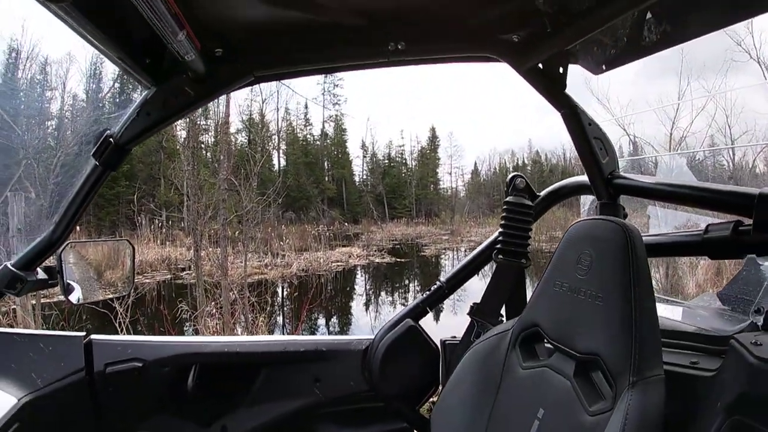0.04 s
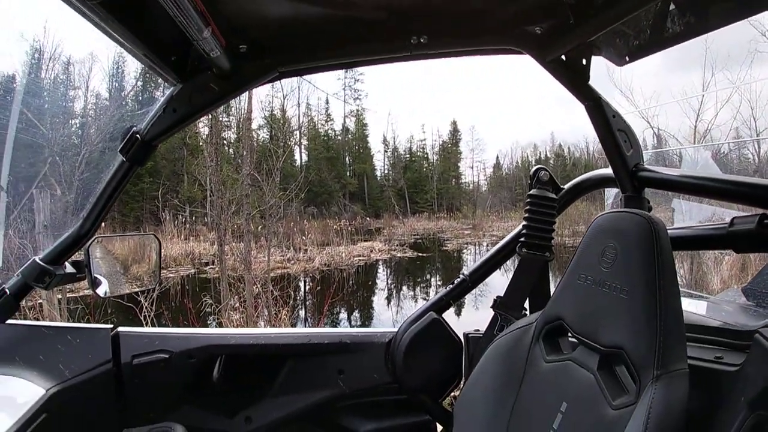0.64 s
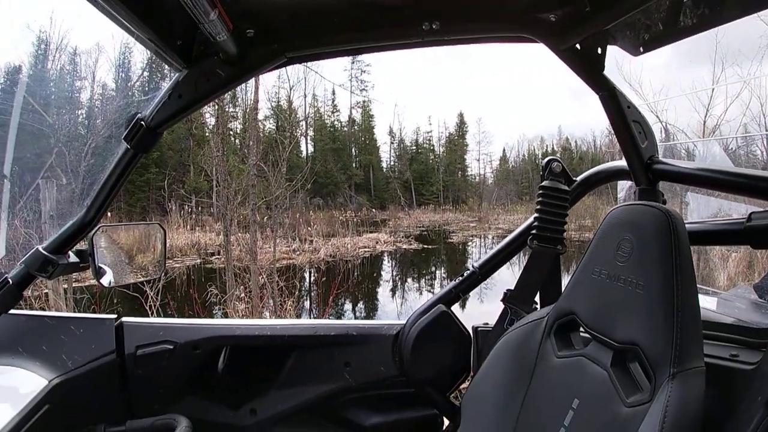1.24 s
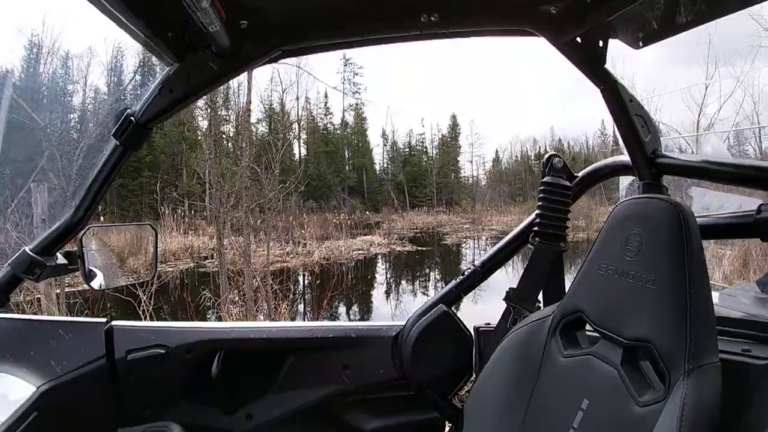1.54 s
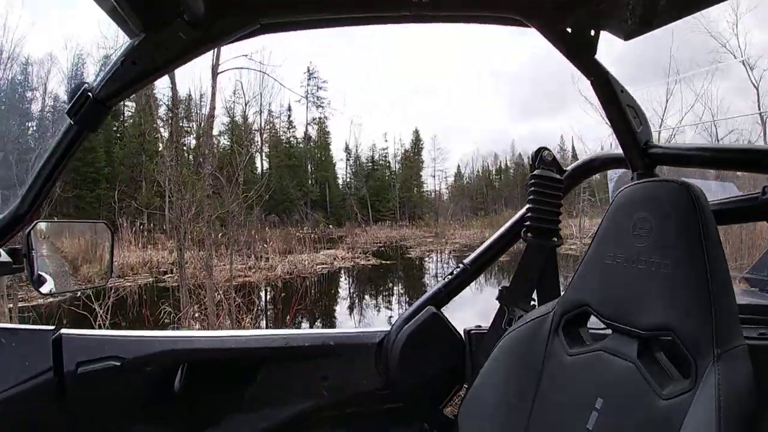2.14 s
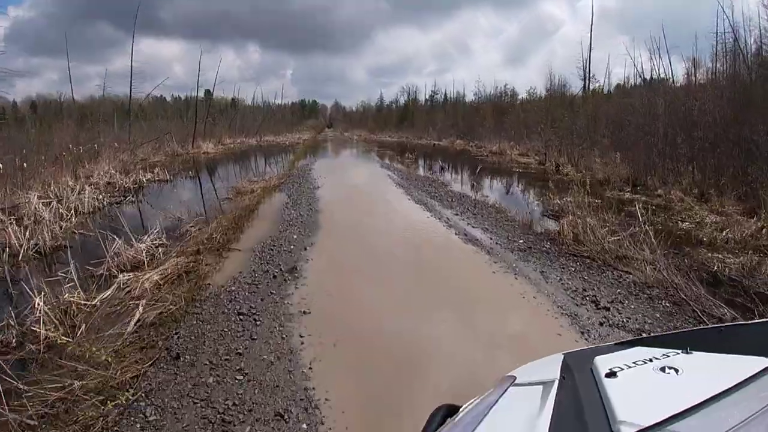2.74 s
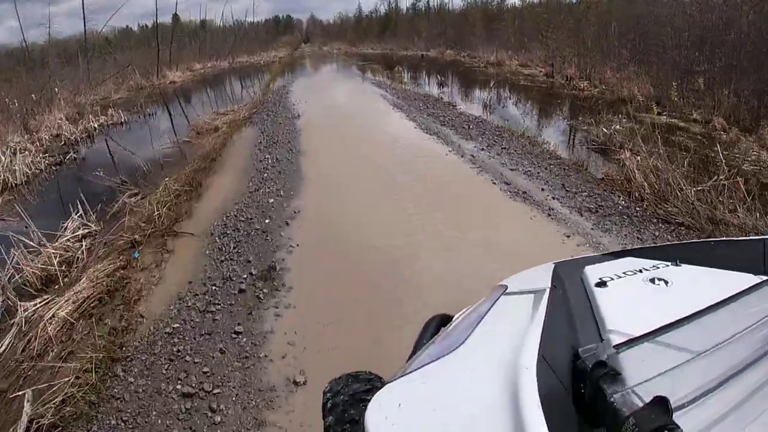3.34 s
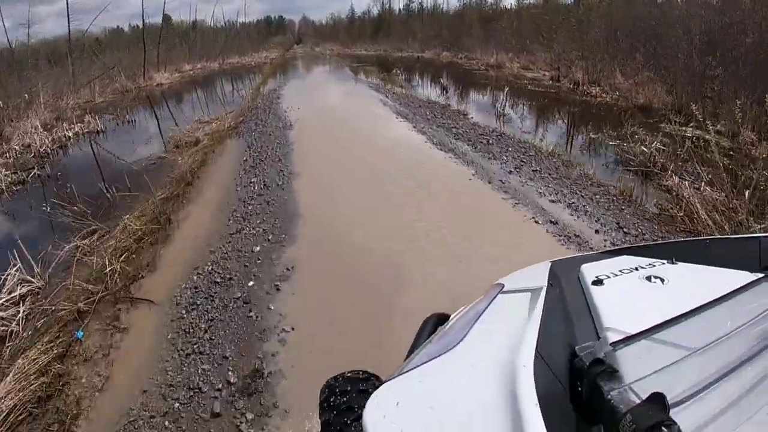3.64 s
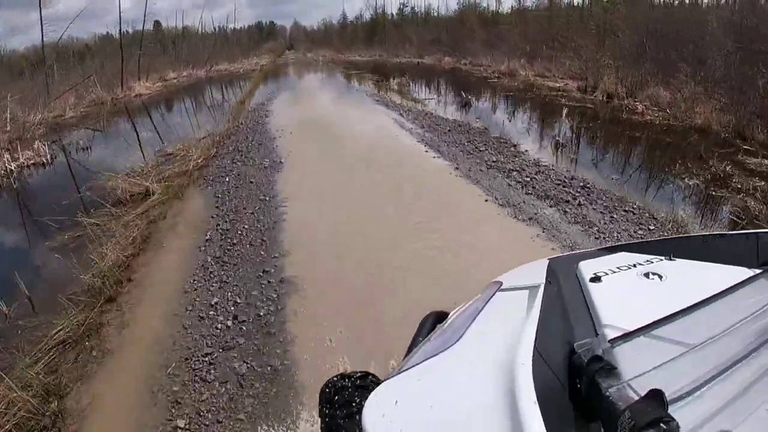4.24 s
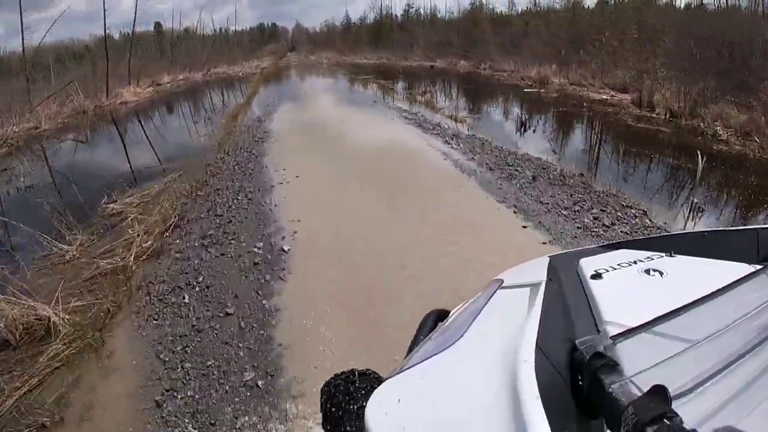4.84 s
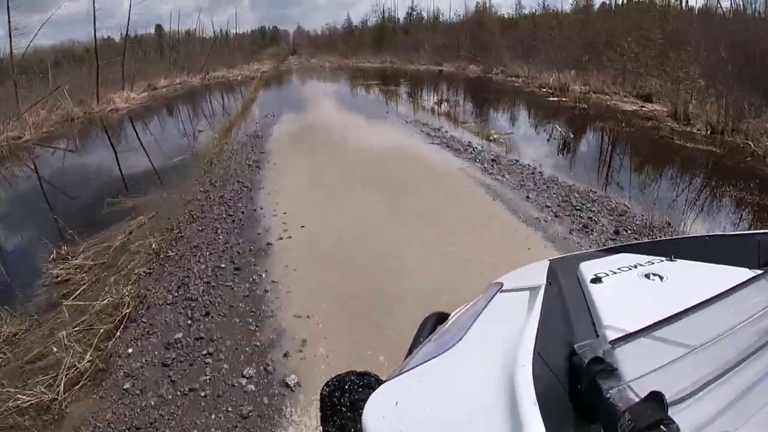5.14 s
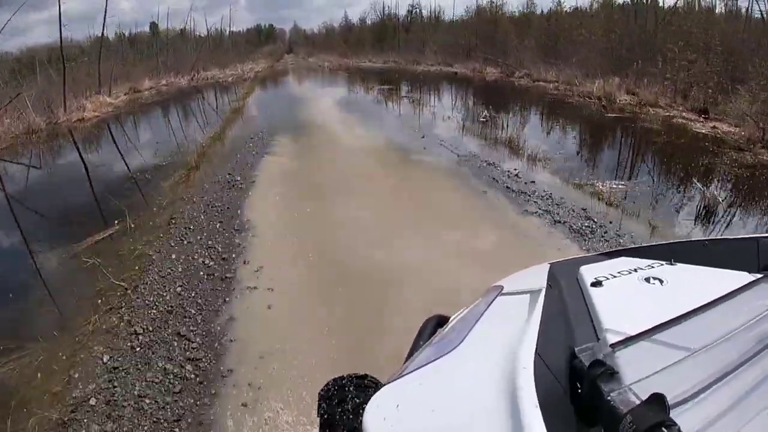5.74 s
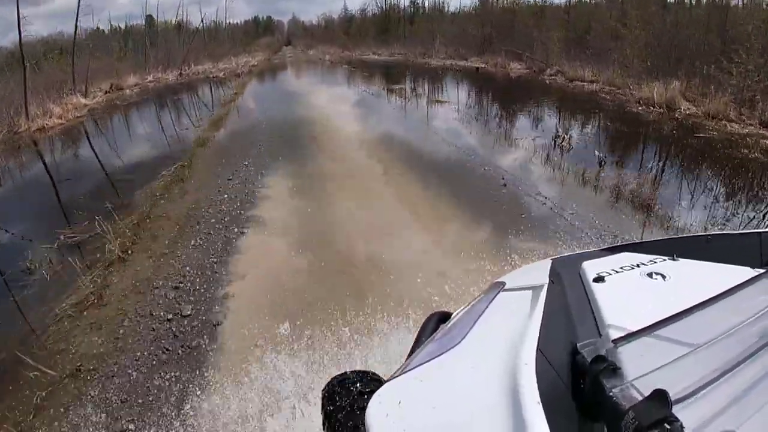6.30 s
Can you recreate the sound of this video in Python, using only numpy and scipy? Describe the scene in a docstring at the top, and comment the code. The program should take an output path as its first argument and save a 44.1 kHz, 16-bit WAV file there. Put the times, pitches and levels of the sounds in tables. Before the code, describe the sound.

An off-road buggy idles with a low, uneven thumping, heard close from the seat, and a buckle clinks briefly. Abruptly the vehicle is under way on a flooded gravel trail, its exhaust droning over clatter and a faint belt whine. Stones knock sharply on the plastic body panels, then water churns and sprays at the wheels, growing stronger. Near the end the engine eases off slightly.

```python
"""A two-cylinder off-road buggy thumps at idle beside a marsh, the microphone at the seat. Each firing rings
the cab; something creaks, a belt squeaks and a buckle clinks close by. Then, abruptly, the buggy is under way
on a flooded gravel trail: the exhaust drones over clatter and belt whine, stones knock on the body panels, and
the wheels plough into deeper water that churns and sprays. Near the end the driver eases off."""
import sys
import numpy as np
from scipy import signal
from scipy.fft import rfft, irfft, next_fast_len
from scipy.io import wavfile
from scipy.ndimage import uniform_filter1d

SR = 44100
rng = np.random.default_rng(int(sys.argv[2]) if len(sys.argv) > 2 else 0)


def transcribe(signal):
    """Save signal, clipped to [-1, 1], as a 16-bit WAV file at the path in sys.argv[1]."""
    frames = np.atleast_2d(signal).T
    limited = np.clip(frames, -1, 1)
    pcm = np.round(limited * 32767).astype(np.int16)
    wavfile.write(sys.argv[1], SR, pcm)


N = 280917
T = np.arange(N) / SR
DRIVE_START_S = 2.429

# Engine speed under way. Each row: time in seconds, firing rate in Hz.
FIRING_RATE = [(2.44, 30.96), (2.61, 34.04), (3.0, 38.0), (3.61, 39.02), (4.56, 38.78), (4.89, 40.12),
               (5.11, 39.38), (5.56, 39.48), (5.87, 37.34), (6.37, 35.4)]
# Exhaust harmonics. Each row: multiple of the firing rate, relative level in dB,
# change in the flood in dB, change off the throttle in dB.
EXHAUST_ORDERS = [(1, -20.5, 5.5, -12), (2, 2.3, 0.17, 0), (3, -3, -0.5, 3.5), (4, -9, -1, -10),
                  (5, -17.5, 3.5, -10.5), (6, -14, -5, -2), (7, -13.5, -8, -1), (8, -34.5, 5.5, -9),
                  (9, -33, 11, -14.5)]
# The two uneven firings at idle. Each row: place in the cycle from 0 to 1, pitch in Hz,
# half length in seconds, level in dB.
FIRING_THUMPS = [(.234, 66, .0099, -22.5), (.626, 83.5, .0157, -22.7)]
# Valve gear and intake. Each row: place in the cycle from 0 to 1, decay in cycles, relative level in dB.
VALVE_RASPS = [(.12, 0.14, -63), (.76, 0.2, -68.5)]
# Belt and gears. Each row: start and end in seconds, multiple of the firing rate, width in Hz,
# level in dB.
BELT_WHINES = [(2.3, 4.5, 38.2, 73, -52.5), (3.1, 3.5, 124, 480, -59.5), (3.78, 4.8, 20.3, 67, -48),
               (2.4, 3.1, 23.5, 180, -52.5)]
# Water at the wheels. Each row: time in seconds, depth where 1 is the flooded stretch.
WATER_DEPTH = [(2.6, 0.26), (3.3, 0.12), (3.72, 0.55), (4.4, 0.89), (4.95, 1.04), (5.5, 0.93), (6.12, 0.95),
               (6.37, 1.5)]
# Stones and slaps of water. Each row: time in seconds, click peak in dB, brightness in dB per octave.
PANEL_KNOCKS = [(2.4801, -20.5, 2.5), (2.7347, -29, 10.5), (2.908, -31.5, 6), (2.929, -23.5, -0.5),
                (2.9935, -22, -5.5), (3.0462, -13, 1), (3.0835, -13, -2), (3.118, -19, -1),
                (3.1287, -18, -1), (3.164, -19, -1), (3.181, -20.5, -9.5), (5.02, -31, 7),
                (5.798, -26, 3.5)]
# Heard after each knock: two brief middle tones and a faint high ringing tone.
# Each row: frequency in Hz, seconds to fall by 60 dB, level in dB against the click's peak.
KNOCK_TONES = [(1724, .045, -25.5), (1848, 0.043, -20), (5300, .06, -33.5)]
# Touches of the buckle. Each row: time in seconds, peak in dB.
BUCKLE_TOUCHES = [(2.083, -30), (2.088, -32), (2.1, -41), (2.104, -38.5), (2.113, -44), (2.119, -43)]
# Rubbing in the cab, then a brief belt squeak. Each row: start and length in seconds, pitch and width in Hz,
# level in dB.
CREAKS_AND_SQUEAK = [(0.877, 0.018, 649, 300, -56), (1.446, 0.037, 1764, 1600, -61.5),
                     (2.34, 0.12, 1335, 223, -56.5)]
# A whistle while wading. One row: start and end in seconds, first pitch in Hz, rise in Hz per second,
# width in Hz, level in dB.
WADING_WHISTLE = (4.8, 5.42, 3610, 290, 70, -57)

# Resonances. Each row: frequency in Hz, seconds to fall by 60 dB, relative level in dB.
CAB_MODES = [(42.5, 0.44, -27), (109.3, 0.23, -25), (165.2, 0.097, -20.5), (187.9, 0.13, -25.5),
             (283.7, 0.21, -40.5)]  # cab and exhaust pipe
BUCKLE_MODES = [(1390, 0.033, -8), (3090, .015, 3), (3870, 0.016, 1), (4330, 0.025, 2), (4400, .02, -3),
                (5460, .02, -2), (7500, 0.024, 2), (7640, .025, -14)]

# Spectra as heard from the seat. Each row: frequency in Hz, relative level in dB.
WHIRR_SPECTRUM = [(200, 8), (330, -1.5), (480, -4), (630, 0.5), (860, -9.5), (970, -5), (1090, -11.5),
                  (1230, -6.5), (1600, -10), (1800, -15), (3500, -16), (4700, -20), (8000, -23),
                  (9200, -30.5), (11500, -44)]
RASP_SPECTRUM = [(1500, -24), (3400, -5.5), (4900, -15), (6200, -4.5), (8000, -8.5), (9500, -19.5),
                 (11500, -32)]
CLATTER_SPECTRUM = [(150, 0), (260, 1), (340, -7.5), (450, -5.5), (620, -13), (780, -11.5), (1020, -15),
                    (1350, -13.5), (1700, -15.5), (2300, -21), (3600, -23.5), (5300, -27.5), (6400, -47.5),
                    (12500, -55.5), (14000, -72.5)]
CHURN_SPECTRUM = [(20, -6), (45, 5.5), (90, 6), (170, 5.5), (280, 2), (360, 3), (470, 1.5), (580, -2),
                  (790, -4.5), (1000, -18), (1400, -22), (2500, -37)]
SPRAY_SPECTRUM = [(450, -4.5), (750, 12), (1050, 4), (1400, 2), (2100, -2.5), (3200, -6.5), (5400, -12.5),
                  (6000, -17.5), (6600, -27), (8000, -41.5)]
MIST_SPECTRUM = [(5500, -8), (7400, -1.5), (8400, -5.5), (10000, 1), (11300, -2.5), (12500, -4.5),
                 (13600, -13), (14500, -31)]
PANEL_SPECTRUM = [(500, -35.5), (1100, -8.5), (1750, 3), (2350, -5), (2800, -8), (3300, -10), (3850, -6.5),
                  (4700, -20.5), (5400, -15.5), (6200, -32), (7500, -34.5), (9000, -42.5), (13000, -43)]


def engine(depth, eased):
    """Under way: exhaust orders shift with load, over throbbing clatter, whines and chassis rumble."""
    firing_hz = curve(FIRING_RATE)
    firings = np.cumsum(firing_hz) / SR + .0045 * wander(14)
    level_db = -23 + 0.07 * (firing_hz - 39)  # louder at higher speed
    drag = np.minimum(depth, 1) ** 2  # load of the water on the wheels
    exhaust = np.zeros(N)
    for order, shallow_db, flood_db, ease_db in EXHAUST_ORDERS:
        order_db = shallow_db + flood_db * drag + ease_db * eased
        waver = np.minimum(0.028 * gain_of(-.7 * order_db), .6) * wander(18)  # weak orders waver most
        lag = 0.245 * (order - 2) ** 2  # the silencer delays high orders, spreading each pulse
        tone = np.sqrt(2) * np.cos(2 * np.pi * order * firings - lag)
        exhaust += gain_of(level_db + order_db) * (1 + waver) * tone
    throb = 1 + 0.059 * np.cos(2 * np.pi * firings)
    clatter = gain_of(-39) * throb * coloured(patchy(noise(), 1.5, 300, 0.063), CLATTER_SPECTRUM)
    whines = sum(gain_of(db) * swell(start, end) * fuzzy_tone(multiple * firing_hz, width_hz)
                 for start, end, multiple, width_hz, db in BELT_WHINES)
    rumble = gain_of(-34.5) * coloured(noise(), [(18, -2.5), (35, 1.5), (55, -5.5), (110, -4.5)])
    return exhaust + clatter + whines + rumble


def idle():
    """Two uneven firings a cycle thump and ring the cab around the microphone, over a steady whirr."""
    cycle_hz = 10.617 - .104 * T  # the speed slowly sags
    governor_hunt = .019 * np.cos(2 * np.pi * 2.34 * (T - .2))
    cycles = np.cumsum(cycle_hz) / SR - .566 + governor_hunt
    thumps, puffs = np.zeros(N), np.zeros(N)
    lead_s, puff_s = .0105, .0012  # the valve opens just before each thump peaks
    for place, hz, half_s, db in FIRING_THUMPS:
        since_s = ((cycles - place + .5) % 1 - .5) / cycle_hz
        thumps += gain_of(db) * np.exp(-(since_s / half_s) ** 2) * np.cos(2 * np.pi * hz * since_s)
        puffs += np.exp(-((since_s + lead_s) / puff_s) ** 2) / (puff_s * SR * np.sqrt(np.pi))
    puffs *= gain_of(0.49 * wander(21))
    cab = signal.oaconvolve(puffs, fading_tones(CAB_MODES, rise_s=0.0092))[:N]
    machinery = body_shake(cycles) + valve_rasp(cycles) + whirr() + fuel_pump()
    return thumps * gain_of(.3 * wander(11)) + cab + machinery


def water(depth, eased):
    """Wheels churn below the seat; drops patter on the body under a fine mist. All grow with depth."""
    doublings = np.log2(depth)
    churn = coloured(patchy(noise() + 0.71 * drops(700, 2.6), 1.6, 140, .05), CHURN_SPECTRUM)
    spray = coloured(patchy(noise() + .75 * drops(1500, 2.8), 1.4, 400, 0.03), SPRAY_SPECTRUM)
    mist = coloured(patchy(noise() + .5 * drops(1500, 3.3), 1.7, 700, .02), MIST_SPECTRUM)
    puddle = gain_of(-35.5) * np.exp(-np.maximum(T - DRIVE_START_S, 0) / .17)  # as the drive begins
    return (churn * (puddle + gain_of(-32.5 + 6 * doublings - 3.5 * eased))
            + spray * gain_of(-44 + 7.5 * doublings)
            + mist * gain_of(-69 + 5.5 * doublings))


def knocks():
    """Stones, water and gravel click and rattle on nearby plastic panels; faint tones follow each."""
    out, size, gravel_per_s = np.zeros(N), 2048, 3
    hz, t = abs(np.fft.fftfreq(size, 1 / SR)), np.arange(size) / SR
    gaps, strengths = rng.random((24, 2)).T
    times = DRIVE_START_S - np.cumsum(np.log(gaps)) / gravel_per_s
    gravel = [(s, -43 + 2.5 * (2 * strength - 1), 5.5) for s, strength in zip(times, strengths)]
    for s, db, brightness in PANEL_KNOCKS + gravel:
        click_db = spectrum_db(PANEL_SPECTRUM, hz) + brightness * np.log2((hz + 200) / 2000)
        log_gain = np.log(gain_of(np.maximum(click_db, -80)))
        click = np.fft.ifft(np.exp(np.conj(signal.hilbert(log_gain)))).real  # minimum phase: sharp onset
        rattle = noise(size) * (0.13 * np.exp(-t / 0.0015) + 0.013 * np.exp(-t / 0.0087))
        click = click + signal.fftconvolve(click, rattle)[:size]
        blow = click / abs(click).max() + fading_tones(KNOCK_TONES, detune=0.046)[:size]
        add(out, s, gain_of(db) * blow)
        add(out, s + .007, gain_of(db - 16.5) * blow)  # rebound
    return out


def buckle():
    """A buckle chatters close to the microphone: each touch is a short scratch and a metal ring."""
    out, t = np.zeros(N), np.arange(SR // 3) / SR
    for s, db in BUCKLE_TOUCHES:
        scratch = signal.lfilter(*signal.butter(6, [900, 8200], "band", fs=SR), noise(len(t)))
        metal = fading_tones(BUCKLE_MODES, detune=0.023, rise_s=0.00024)
        clink = metal + 1.04 * scratch * np.exp(-t / 0.0076)
        add(out, s, gain_of(db) * clink / abs(clink).max())
    return out


def body_shake(cycles):
    """The body shakes with each pair of firings at idle."""
    midpoint = np.mean([place for place, *_ in FIRING_THUMPS])
    pulsing = 1 + 0.42 * np.cos(2 * np.pi * (cycles - midpoint))
    shake = coloured(noise(), [(28, -3), (100, 0), (200, -5), (260, -14), (320, -26)])
    return gain_of(-43) * pulsing * shake


def valve_rasp(cycles):
    """Valve gear and intake rasp in step with the idle."""
    bursts = sum(gain_of(db) * np.exp(-((cycles - place) % 1) / decay)
                 for place, decay, db in VALVE_RASPS)
    envelope = uniform_filter1d(bursts, 400) * gain_of(2.5 + 2.1 * wander(18))
    return envelope * coloured(noise(), RASP_SPECTRUM)


def whirr():
    """The idling engine's even, slightly grainy noise."""
    grain = patchy(noise() + 0.3 * drops(300, 2.5), 1.34, 500, .02)
    return coloured(grain, WHIRR_SPECTRUM) * gain_of(-56 + .8 * wander(40))


def fuel_pump():
    """The pump sings a faint high tone and its octave."""
    return sum(gain_of(db) * np.sin(2 * np.pi * harmonic * np.cumsum(5100 + 6 * wander(6.8)) / SR)
               for harmonic, db in [(1, -79.5), (2, -94.5)])


def creaks():
    """Something in the cab rubs in a few quick slips, then a belt squeaks briefly."""
    slips = 1 + 0.78 * np.cos(2 * np.pi * 60 * T)
    return slips * sum(gain_of(db) * swell(s, s + length) * fuzzy_tone(np.full(N, hz), width_hz)
                       for s, length, hz, width_hz, db in CREAKS_AND_SQUEAK)


def whistle():
    """A thin, rough tone climbs steadily behind the water."""
    start, end, hz, rise, width_hz, db = WADING_WHISTLE
    return gain_of(db) * swell(start, end) * fuzzy_tone(hz + rise * (T - start), width_hz)


def fading_tones(rows, detune=0., rise_s=1e-5):
    """Sines that start together and die away."""
    t = np.arange(SR // 3) / SR
    tones = np.zeros(len(t))
    for hz, t60, db in rows:
        detuned_hz = hz * (1 + detune * rng.standard_normal())
        tones += gain_of(db - 60 * t / t60) * np.sin(2 * np.pi * detuned_hz * t)
    return tones * (1 - np.exp(-t / rise_s)) ** 2


def drops(per_s, spread_db):
    """Sparse impacts, a few of them large."""
    sizes = gain_of(spread_db * np.minimum(rng.exponential(1, N), 5))
    return unit_rms(sizes * rng.choice([-1, 1], N) * (rng.random(N) < per_s / SR))


def fuzzy_tone(hz, width_hz):
    """A narrow band of noise that follows a pitch."""
    angle = 2 * np.pi * np.cumsum(hz) / SR
    return unit_rms(wander(width_hz / 2) * np.cos(angle) + wander(width_hz / 2) * np.sin(angle))


def patchy(x, depth_db, patch_hz, patch_s):
    """Lets patches of time and pitch swell and sink."""
    frames = signal.stft(x, nperseg=512, noverlap=384)[2]
    field = uniform_filter1d(noise(frames.shape), max(round(patch_hz * 512 / SR), 1), axis=0)
    field = unit_rms(uniform_filter1d(field, max(round(patch_s * SR / 128), 1), axis=1))
    return signal.istft(frames * gain_of(depth_db * field), nperseg=512, noverlap=384)[1][:N]


def wander(hz):
    """Random drift of rms 1, up to about hz."""
    size = next_fast_len(N)
    f = np.fft.rfftfreq(size, 1 / SR)
    return unit_rms(irfft(rfft(noise(size)) / (1 + (f / hz) ** 4), size)[:N])


def coloured(x, points):
    """Gives x a spectrum of (Hz, dB) points, at rms 1."""
    return unit_rms(irfft(rfft(x) * gain_of(spectrum_db(points, np.fft.rfftfreq(N, 1 / SR))), N))


def spectrum_db(points, hz):
    """Joins (Hz, dB) points on a log-frequency axis, falling 24 dB an octave past the ends."""
    f, db = np.transpose(points)
    octave = np.log2(hz + 1)
    outside = np.maximum(np.log2(f[0]) - octave, 0) + np.maximum(octave - np.log2(f[-1]), 0)
    return np.interp(octave, np.log2(f), db) - 24 * outside


def swell(start, end):
    """A rounded rise and fall between two times."""
    return np.sqrt(np.maximum(np.sin(np.pi * np.clip((T - start) / (end - start), 0, 1)), 0))


def curve(rows):
    """Joins (seconds, value) rows at every sample."""
    return np.interp(T, *np.transpose(rows))


def add(mix, s, sound):
    """Mixes a sound in at s seconds."""
    part = mix[max(round(s * SR), 0):][:len(sound)]
    part += sound[:len(part)]


def noise(size=N):
    """White noise."""
    return rng.standard_normal(size)


def gain_of(db):
    """Decibels to amplitude."""
    return 10 ** (np.asarray(db) / 20)


def unit_rms(x):
    """Scales to rms 1."""
    return x / np.sqrt(np.mean(x ** 2) + 1e-20)


def scene():
    """From the seat, in mono: first the idle, then the drive, ruled by water depth and throttle."""
    driving = np.clip((T - DRIVE_START_S) / .001, 0, 1)
    depth = curve(WATER_DEPTH)
    eased = np.clip((T - 5.29) / 0.61, 0, 1)  # the driver comes off the throttle
    parked = idle() + buckle() + creaks()
    moving = engine(depth, eased) + whistle() + water(depth, eased) + knocks()
    return ((1 - driving) * parked + driving * moving)[None]


def record(dry):
    """The camera passes nothing above about 13.8 kHz."""
    lowpass = signal.firwin(511, 13800, window=("kaiser", 9), fs=SR)
    return signal.oaconvolve(dry, lowpass[None], "same")


dry = scene()
out = record(dry)
transcribe(out)
```